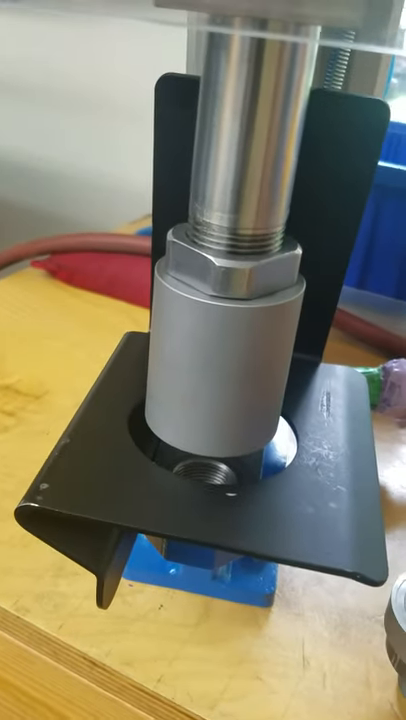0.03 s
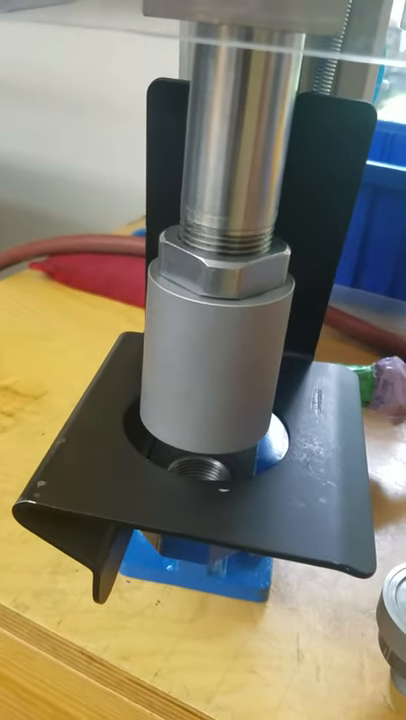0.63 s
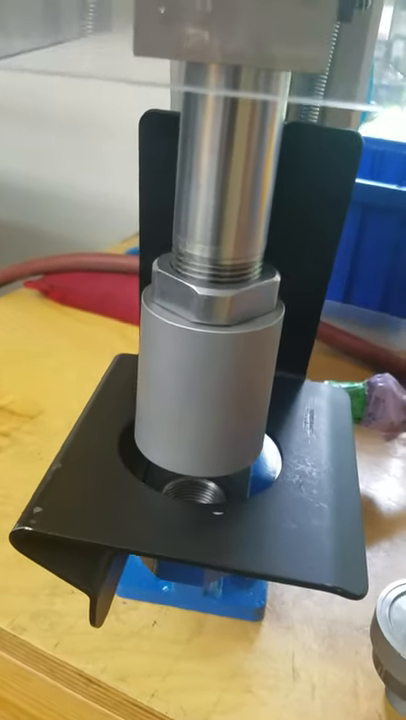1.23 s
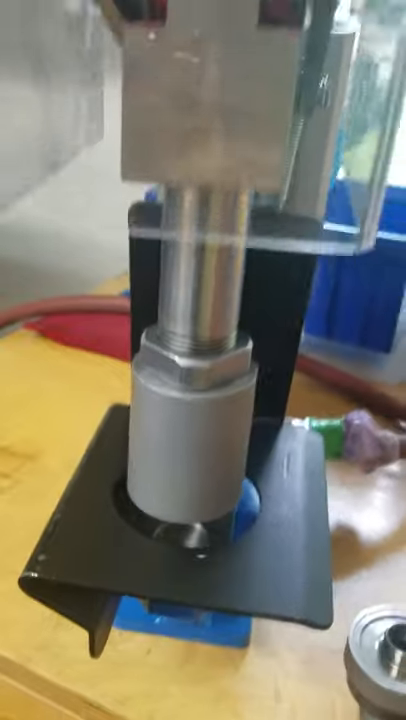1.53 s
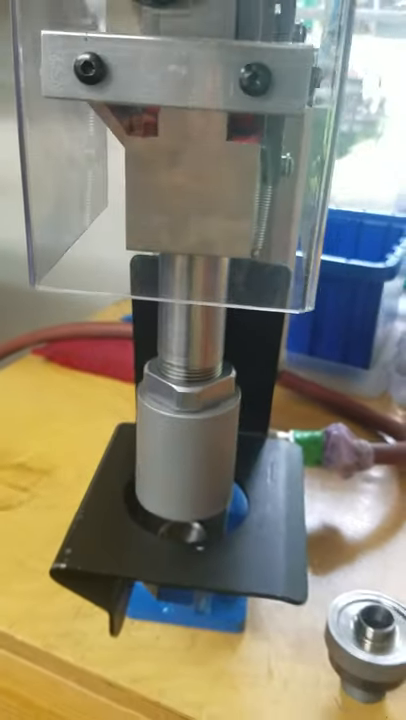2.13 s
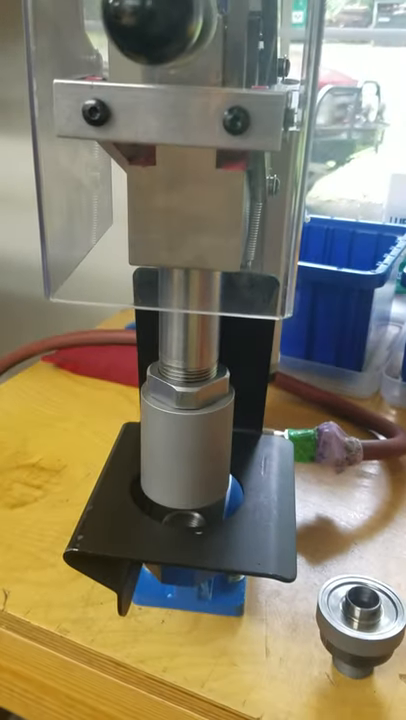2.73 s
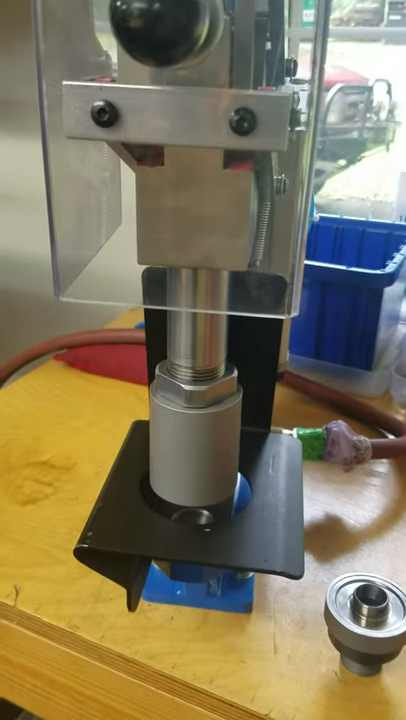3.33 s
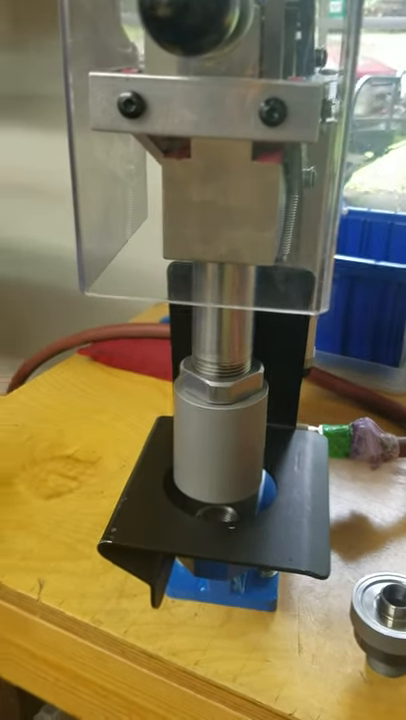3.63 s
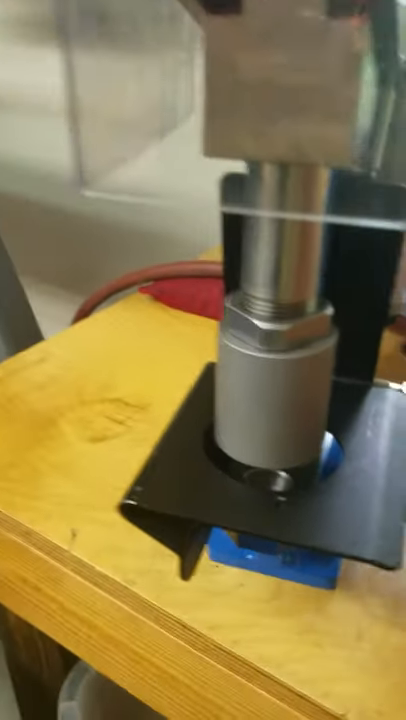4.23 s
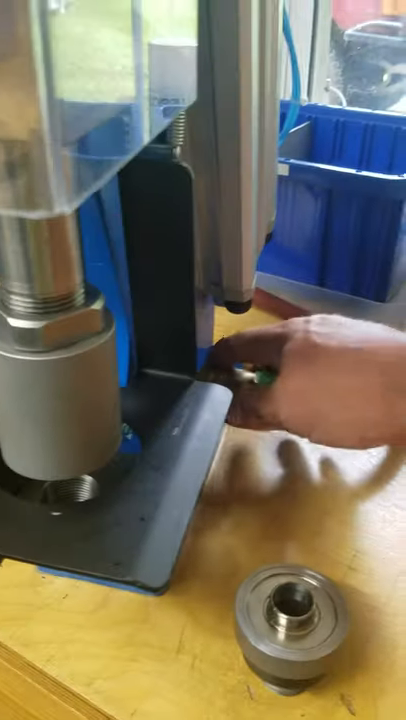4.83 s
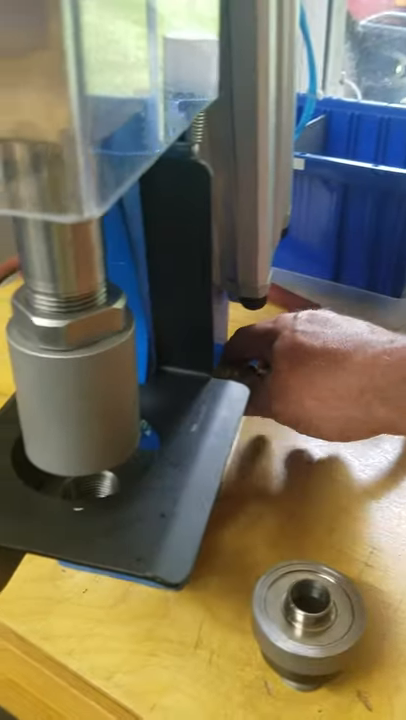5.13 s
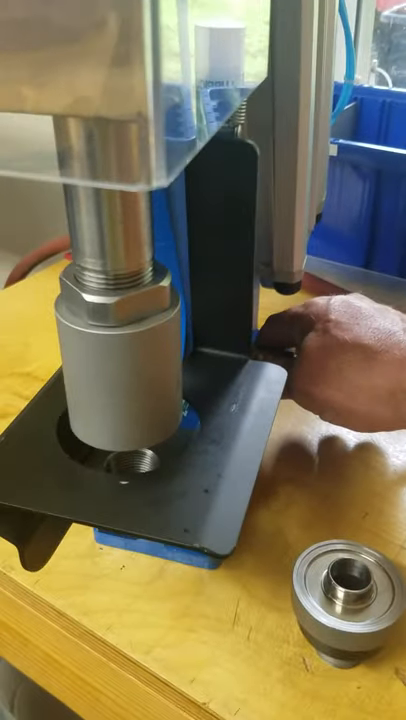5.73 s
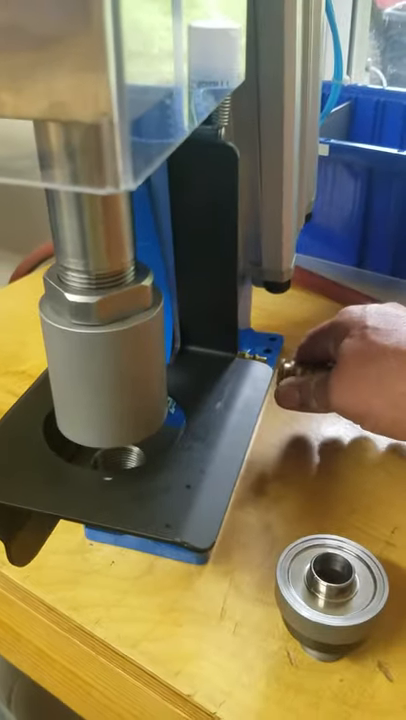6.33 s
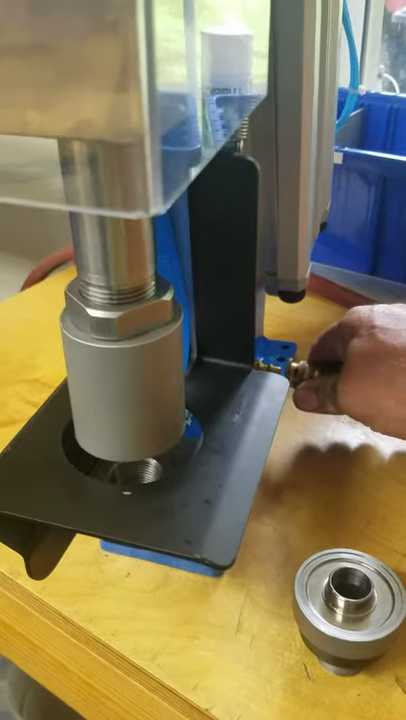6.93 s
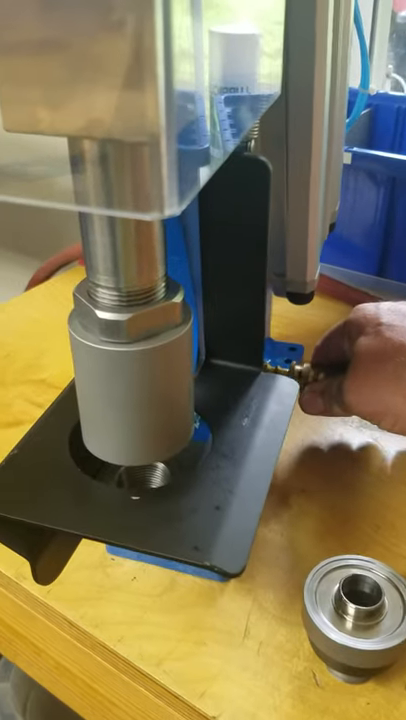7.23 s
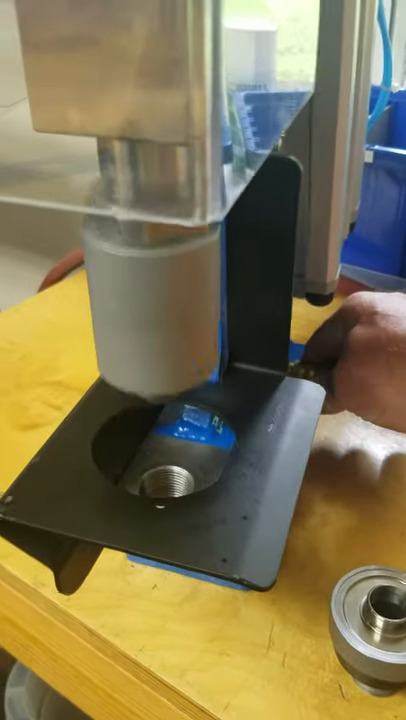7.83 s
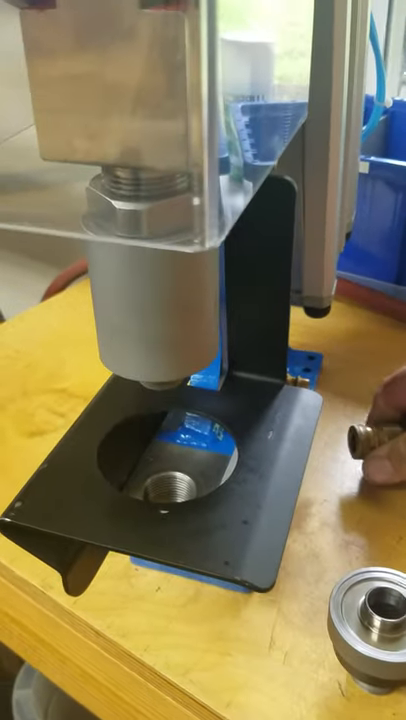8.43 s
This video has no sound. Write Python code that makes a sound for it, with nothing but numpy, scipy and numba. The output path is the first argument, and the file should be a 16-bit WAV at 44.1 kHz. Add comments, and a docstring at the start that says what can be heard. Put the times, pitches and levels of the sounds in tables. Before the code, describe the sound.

Heard close to a pneumatic bench press, a workshop hums steadily with fan noise and a thin leak. A sudden loud hiss of compressed air breaks in for about a second, gusting on the microphone, and ends in a metallic valve snap. A tiny squeak and a few light clicks follow, then a second shrill rush in quick surges, with a metal knock from the ram and a hollow ringing as the air drains.

```python
"""Pneumatic bench press in a humming workshop.

Fans, machine tones and a faint leak run throughout. A hand works the air fitting: it clicks, air
blasts out, gusts over the microphone and rings the cylinder ports. The valve snaps shut, a seal
squeaks, the fitting clicks, then air rushes again and the ram knocks as it lifts. Heard from a
phone close to the ram, whose gain control ducks the hum after each rush."""
import sys
import numpy as np
from scipy import signal
from scipy.fft import rfft, irfft, next_fast_len
from scipy.io import wavfile
from scipy.ndimage import uniform_filter1d, minimum_filter1d, map_coordinates
from numba import njit

SR = 44100
rng = np.random.default_rng(int(sys.argv[2]) if len(sys.argv) > 2 else 0)


def persist_wave(psi):
    """Save psi, clipped to +-1, as 16-bit WAV."""
    counts = np.round(np.clip(psi, -1, 1) * 32767).astype(np.int16)
    wavfile.write(sys.argv[1], SR, np.atleast_2d(counts).T)


N = 374585
TIME_S = np.arange(N) / SR
FREQ_HZ = np.maximum(np.fft.rfftfreq(N, 1 / SR), 1)


def undb(db):
    """Decibels to gain."""
    return np.exp(np.asarray(db) * (np.log(10) / 20))


def unit(x):
    """Scale to rms 1."""
    return x / np.sqrt(np.mean(x ** 2))


def curves(table):
    """Table columns, interpolated linearly over t/s."""
    times_s, *columns = np.transpose(table)
    return [np.interp(TIME_S, np.sort(times_s), column) for column in columns]


def colour(points):
    """Gain spectrum from (f/Hz, level/dB) points."""
    hz, db = np.transpose(points)
    return undb(np.interp(np.log(FREQ_HZ), np.log(hz), db))


def resonances(modes):
    """Gain spectrum of (f/Hz, width/Hz, level/dB) resonances."""
    return np.sqrt(sum(undb(db) ** 2 / (1 + (hz / width_hz * (FREQ_HZ / hz - hz / FREQ_HZ)) ** 2)
                       for hz, width_hz, db in modes))


def above(hz):
    """Gain spectrum of a steep bass cut."""
    return 1 / (1 + (hz / FREQ_HZ) ** 4)


def filtered(x, gain):
    """Apply a gain spectrum."""
    size = next_fast_len(N, True)
    hz = np.fft.rfftfreq(size, 1 / SR)
    return irfft(rfft(x, size) * np.interp(hz, FREQ_HZ, gain), size)[..., :N]


def walk(rate_hz):
    """Smooth random curve, spread near 1."""
    knots = rng.standard_normal(int(N / SR * rate_hz) + 2)
    return 1.2 * np.interp(TIME_S * rate_hz, np.arange(len(knots)), knots)


def air(gain, shared, lag_samples=0):
    """Coloured stereo noise; the shared part lags on the right."""
    noise = rng.standard_normal((3, N))
    common = np.array([noise[2], np.roll(noise[2], lag_samples)])
    return unit(filtered(np.sqrt(shared) * common + np.sqrt(1 - shared) * noise[:2], gain))


def diffuse(gain, mic_gap_m=0.1, sound_m_s=343):
    """Noise from all around: long waves reach both microphones alike, short ones unrelated."""
    coherence = np.sinc(2 * FREQ_HZ * mic_gap_m / sound_m_s)
    mid = filtered(rng.standard_normal(N), gain * np.sqrt(1 + coherence))
    side = filtered(rng.standard_normal(N), gain * np.sqrt(1 - coherence))
    return unit(np.array([mid + side, mid - side]))


def bursts(table, sag_power=2.84):
    """Swell, sag, release. Gives the strongest burst's level/dB, age/s, release loss/dB, extra columns."""
    rows = np.array(table)
    start_s, attack_s, hold_s, db, full_sag_db, release_db_s = rows.T[:6, :, None]
    age_s = np.maximum(TIME_S - start_s, 1e-6)
    rise_db = 40 * np.log10(np.minimum(age_s / attack_s, 1))
    sag_db = full_sag_db * np.clip((age_s - attack_s) / hold_s, 0, 1) ** sag_power
    lost_db = release_db_s * np.maximum(age_s - attack_s - hold_s, 0)
    level_db = db + rise_db - sag_db - lost_db
    strongest = level_db.argmax(axis=0)
    tracks = [track[strongest, np.arange(N)] for track in (level_db, age_s, lost_db)]
    return tracks + list(rows[strongest, 6:].T)


def reflect(x, t60_low_s, t60_high_s, delay_s):
    """Diffuse reflections of unit energy, with separate decays below and above 3 kHz."""
    t = TIME_S[:SR]
    tail = np.zeros((2, SR))
    for band, t60_s in (("low", t60_low_s), ("high", t60_high_s)):
        crossover = signal.butter(2, 3000, band, fs=SR, output="sos")
        tail += signal.sosfilt(crossover, rng.standard_normal((2, SR))) * undb(-60 * t / t60_s)
    tail *= t > delay_s
    return signal.fftconvolve(x, unit(tail) / np.sqrt(SR), axes=1)[:, :N]


def knocks(blows, modes, crack_t60_s, scatter_db, scatter_t60_s):
    """Each blow cracks and rings the modes; bench and guard scatter it."""
    t = TIME_S[:SR // 4]
    ring = sum((-1) ** k * undb(db - 60 * t / t60_s) * np.sin(2 * np.pi * hz * t)
               for k, (hz, t60_s, db) in enumerate(modes))
    ring /= np.abs(ring).max()
    out = np.zeros((2, N))
    for start_s, db, crack_db in blows:
        start = int(start_s * SR)
        crack = rng.standard_normal((2, len(t))) * undb(crack_db - 60 * t / crack_t60_s)
        out[:, start:start + len(t)] += undb(db) * (ring + crack)
    return out + undb(scatter_db) * reflect(out, scatter_t60_s, scatter_t60_s, delay_s=0.00015)


# bench, guard, wall: left delay/s, right delay/s, level/dB
NEAR_ECHOES = [(.0011, 0.001211, -44.5), (.0029, 0.003973, -21.5), (.0047, 0.0077, -13.5),
               (.0083, .0074, -13), (0.0125, .0141, -13)]


def echoes(x):
    """Close, hard surfaces comb the sound differently at each microphone."""
    out = x.copy()
    for left_s, right_s, db in NEAR_ECHOES:
        out += undb(db) * np.array([np.roll(x[0], int(left_s * SR)), np.roll(x[1], int(right_s * SR))])
    return out / np.sqrt(1 + sum(undb(db) ** 2 for _, _, db in NEAR_ECHOES))


# fan spectrum: f/Hz, level/dB
FAN_SPECTRUM = [(20, -12), (45, 2), (80, 4.5), (130, 0), (200, -4.5), (370, -6), (460, -10.5), (620, -9.5),
                (900, -15.5), (1650, -19.5), (2700, -14.5), (4500, -24), (6500, -24), (12000, -46)]


def fans(level_db):
    """Fans and ventilation: diffuse, slightly wavering noise."""
    return echoes(undb(level_db + .5 * walk(4.7)) * diffuse(colour(FAN_SPECTRUM)))


# leak hiss: f/Hz, level/dB
LEAK_SPECTRUM = [(3000, -16.5), (6500, -3.5), (9300, -10), (11000, -8.5), (13000, 2), (15800, -3.5)]
# hiss envelope: t/s, level/dB
LEAK_ENVELOPE = [(0.0, -59.5), (1.36, -57), (1.81, -58), (2.12, -58), (2.5, -57.5), (2.99, -55.5),
                 (3.55, -59), (3.79, -58), (4.23, -52.5), (4.51, -54), (4.71, -59), (5.6, -56.5)]
# whistles: f/Hz, width/Hz, level/dB
LEAK_WHISTLES = [(12824, 7, -5.5), (13502, 5, 4)]


def leak(hiss_db, whistle_db, left_db):
    """The air line leaks and whistles; its hiss grows as the phone turns to it."""
    envelope = undb(hiss_db + curves(LEAK_ENVELOPE)[0])
    hiss = envelope * air(colour(LEAK_SPECTRUM), shared=0.1, lag_samples=11)
    whistle = undb(whistle_db) * air(resonances(LEAK_WHISTLES), shared=.3)
    pan = undb([[left_db / 2], [-left_db / 2]])
    return pan * (echoes(hiss) + whistle)


# mains and machine tones: f/Hz, level/dB
HUM_TONES = [(119.8, -51), (156.4, -64.5), (44.092, -68), (71, -65), (97.577, -61.5), (244.69, -72.5),
             (352, -69.5), (509, -71.5), (587, -70), (617.64, -64.5), (700, -75.5), (1054, -65),
             (1082, -70), (1111, -59), (1347, -63.5), (2322.9, -76), (13502, -66.5)]


def hum(gain_db, drift_rad, right_lag_s):
    """Mains hum and machine tones: steady level, drifting phase."""
    arrival_s = np.array([TIME_S, TIME_S - right_lag_s])
    out = np.zeros((2, N))
    for hz, db in HUM_TONES:
        phase = 2 * np.pi * hz * arrival_s + drift_rad * walk(12)
        out += np.sqrt(2) * undb(db + gain_db) * np.sin(phase)
    return out


# motor tone, whine, whistle: f/Hz
PASSING_TONES_HZ = (1232.6, 1825.1, 6400)
# their envelopes: t/s, motor/dB, whine/dB, whistle/dB
PASSING_ENVELOPES = [(0, -77, -73.5, -67.5), (1.25, -76, -78.5, -71), (1.498, -76, -73.5, -76.5),
                     (3.299, -72, -74, -80), (4.101, -73, -79, -73.5), (4.6, -78.5, -68.5, -78.5),
                     (8.4, -83, -68, -81.5)]


def passing_tones(waver_db, drift_rad):
    """A motor tone, its whine and a thin whistle come and go as the phone moves."""
    out = np.zeros((2, N))
    for hz, db in zip(PASSING_TONES_HZ, curves(PASSING_ENVELOPES)):
        for mic in range(2):
            amplitude = np.sqrt(2) * undb(db + waver_db * walk(5.7))
            out[mic] += amplitude * np.sin(2 * np.pi * hz * TIME_S + drift_rad * walk(4.3))
    return out


# clicks: t/s, level/dB, relative crack/dB
FITTING_BLOWS = [(5.7565, -32.5, -25), (7.202, -34.5, -29.5), (7.356, -56, -20), (7.388, -28.5, -8),
                 (7.4515, -29, -15)]
# fitting ring: f/Hz, t60/s, level/dB
FITTING_MODES = [(431, 0.036, -15), (818, 0.01, 1.5), (1100, .02, -3), (1420, 0.0076, -2),
                 (1904, 0.014, -2), (2631.3, 0.0091, -3), (4497, .02, -16.5), (7300, .02, -20.5)]


def fitting_clicks():
    """The fitting shifts under the fingers and rings."""
    return knocks(FITTING_BLOWS, FITTING_MODES, crack_t60_s=0.012, scatter_db=2.5, scatter_t60_s=0.14)


# venting: t/s, attack/s, hold/s, level/dB, sag/dB, release/(dB/s), surge/dB, shrill/dB, dulling/(dB/s)
JET_BURSTS = [(5.765, 0.015, 0.71, -1.5, 14, 139, 7, 1.5, -0.5),
              (7.553, 0.038, .01, -11, .5, 257, -2, 7.5, 15),
              (7.581, 0.012, .008, -1.5, 1.5, 248, 3.5, 6.5, 13),
              (7.62, 0.045, 0.16, -9, -1, 423.5, -7.5, -1.5, 0),
              (7.845, 0.055, 0.25, -1, 3, 221.5, -6, 9.5, 33)]
# broad hiss: f/Hz, level/dB
HISS_SPECTRUM = [(100, -20.5), (300, -9), (600, -8), (1150, -3.5), (1500, -9), (2300, -3.5), (3300, -3.5),
                 (4600, -1), (6200, 1.5), (8000, 0), (12000, -1), (16000, -4.5)]
# shrill top: f/Hz, level/dB
TOP_SPECTRUM = [(6000, -27.5), (9500, -12), (11200, -4.5), (12600, -1), (15000, 0.5), (16000, -4.5)]
# jet swing: t/s, left minus right/dB
JET_PAN = [(5.8, -3), (6.2, .5), (6.5, 0), (7.6, -1), (7.7, 1), (7.95, -3), (8.15, -1)]


def jet(hiss_db, top_db, flutter_db, sizzle_db):
    """Escaping air: a broad hiss under a shrill, fluttering top that dulls as the pressure drains."""
    surge_s, top_fade_db_per_db = 0.1, 0.42
    sizzle_hz, extra_dulling = 13200, .35
    db, age_s, lost_db, surge_db, shrill_db, dulling_db_s = bursts(JET_BURSTS)
    db = db + surge_db * np.exp(-age_s / surge_s)  # pressure transient on opening
    dulled_db = dulling_db_s * age_s
    shrill_db = shrill_db - dulled_db - top_fade_db_per_db * lost_db
    hiss = undb(hiss_db) * air(colour(HISS_SPECTRUM), shared=0.53, lag_samples=2)
    top = air(colour(TOP_SPECTRUM), shared=0.15, lag_samples=2)
    sizzle = filtered(top, 1. * (FREQ_HZ > sizzle_hz))
    top = top - sizzle + sizzle * undb(sizzle_db * walk(25) - extra_dulling * dulled_db)
    top *= undb(top_db + shrill_db + flutter_db * walk(90))
    pan_db = curves(JET_PAN)[0]
    return (hiss + top) * undb(db + np.array([pan_db, -pan_db]) / 2)


# air on the microphone: t/s, attack/s, hold/s, level/dB, sag/dB, release/(dB/s)
GUST_BURSTS = [(5.765, .016, 0.3716, -0.87, 2, 1101), (6.16, 0.014, 0.026, -15.5, 1.5, 700),
               (7.581, 0.012, .006, -10.5, .5, 598.5), (7.892, .009, 0.031756, -5, 2.5, 650),
               (7.945, 0.021, .07, -5, 8.5, 1000)]
# wind noise: f/Hz, level/dB
GUST_SPECTRUM = [(25, -16.5), (70, -6.5), (160, -0.5), (400, 0), (800, -1), (1400, -2), (2200, -4),
                 (4000, -8), (7000, -24.5), (16000, -29)]


def gust(gust_db, rumble_db, eddy_db, billow_db):
    """Eddies slap each microphone separately; a weak stream leaves mostly rumble."""
    push_db, push_s = 4, 0.044
    rumble_hz, rumble_db_per_db = 105, 0.44
    db, age_s, _ = bursts(GUST_BURSTS)
    db = db + push_db * np.exp(-age_s / push_s)
    eddies = np.array([undb(eddy_db * walk(900) + billow_db * walk(70)) for mic in range(2)])
    slaps = unit(filtered(eddies * rng.standard_normal((2, N)), colour(GUST_SPECTRUM)))
    rumble = filtered(slaps, 1 - above(rumble_hz))
    return (slaps - rumble) * undb(gust_db + db) + rumble * undb(rumble_db + rumble_db_per_db * db)


# port flow: t/s, attack/s, hold/s, level/dB, sag/dB, release/(dB/s), pitch ratio
FLOW_BURSTS = [(6.12, 0.096, 0.39, -27.5, 5, 170.5, 0.74), (7.59, .11, .125, -14.5, 1.0014, 350, 1.1),
               (7.86, .06, .13, -22, -3, 160, 1), (8.07, .075, .012, -10, 0, 144.5, .98)]
# cylinder emptying: t/s, attack/s, hold/s, level/dB, sag/dB, release/(dB/s)
PUFF_BURSTS = [(7.57, 0.031, 0.041, -18.5, -3, 341.5), (7.82, 0.07414, 0.038, -22, -4, 300)]
# ports at pitch ratio 1: f/Hz, width/Hz, level/dB
PORT_MODES = [(900, 370, -9.5), (1370, 243.3, 0), (1868.4, 96.3, -2), (2150, 360, -3), (2820, 150, 0),
              (4900, 1300, -9.5), (7165, 300, -8)]
# chamber: f/Hz, width/Hz, level/dB
CHAMBER_MODES = [(190, 35, -5), (362, 130, -2), (615.3, 243, -8.5), (1020, 31, -14)]


def cylinder_flow(flow_db, puff_db, hollow_db, flutter_db):
    """Air rings the cylinder's ports and, more dully, its chamber; puffs reach the deepest mode."""
    sink_octaves_per_db, linger_db_per_db = 0.1, 0.72
    db, age_s, lost_db, pitch = bursts(FLOW_BURSTS)
    # the moving piston slides the resonances; they sink as the flow dies
    sink = np.maximum(2 ** (-sink_octaves_per_db * lost_db), .5)
    read_index = np.cumsum(pitch * sink) % (N - 1)
    ports = air(resonances(PORT_MODES) * above(650), shared=0.15)
    sliding = np.array([map_coordinates(channel, [read_index], order=3) for channel in ports])
    chamber = air(resonances(CHAMBER_MODES) * above(130), shared=0.43)
    flow = sliding * undb(flow_db + db + flutter_db * walk(50))
    hollow = filtered(chamber, above(380)) * undb(hollow_db + db + linger_db_per_db * lost_db)
    puffs = chamber * undb(puff_db + bursts(PUFF_BURSTS)[0])
    return flow + hollow + puffs


# valve closing: t/s, level/dB, relative crack/dB
VALVE_BLOWS = [(6.7175, -14, -5.5), (6.7225, -24, -5)]
# valve ring: f/Hz, t60/s, level/dB
VALVE_MODES = [(345.7, 0.048, 11), (553, .035, 5), (874, .032, 6), (2869.6, .05, 2), (3140, .035, 3),
               (5000, .06, -14), (6530, .037, -11), (10250, .025, 4), (14301, .02, 5.5)]


def valve_snap():
    """The valve snaps shut and rings."""
    return knocks(VALVE_BLOWS, VALVE_MODES, crack_t60_s=.045, scatter_db=-6, scatter_t60_s=.04)


# relaxing seal: t/s, f/Hz, level/dB
SEAL_GLIDE = [(6.78, 1600, -70), (6.825, 1546, -50), (6.87, 1433, -56.5), (6.91, 1410, -56),
              (6.99, 1400, -68)]


def seal_squeak(jitter):
    """Rubber slips on steel: one faint, unsteady falling tone."""
    hz, db = curves(SEAL_GLIDE)
    sounding = (TIME_S > SEAL_GLIDE[0][0]) & (TIME_S < SEAL_GLIDE[-1][0])
    phase = 2 * np.pi * np.cumsum(hz * (1 + jitter * walk(300))) / SR
    return sounding * undb(db) * np.sin(phase)


# ram rattle: t/s, level/dB, relative crack/dB
RAM_BLOWS = [(7.8328, 2.5, -27), (7.8355, 8, -12.5), (7.841, 3.5, -20), (7.851, -1, -24)]
# frame ring: f/Hz, t60/s, level/dB
FRAME_MODES = [(147.7, 0.0998, -20.5), (227, 0.1119, -16.5), (343, 0.07, -6), (433, 0.059, -4),
               (620.64, .06, -3), (826, 0.0218, -5), (980, 0.024, -6), (1260, 0.016, -1.5),
               (1736, 0.079, -13), (2270, 0.041, -19.5)]


def ram_knock():
    """The ram breaks loose and rattles, ringing the frame."""
    return knocks(RAM_BLOWS, FRAME_MODES, crack_t60_s=0.029, scatter_db=-4.5, scatter_t60_s=0.032)


def scene():
    """Workshop, press, room reflections and wind on the microphone."""
    workshop = fans(level_db=-49.5) + leak(hiss_db=2.5, whistle_db=-63.5, left_db=4.5)
    workshop += hum(gain_db=1.5, drift_rad=0.16, right_lag_s=0.00033)
    workshop += passing_tones(waver_db=1.1, drift_rad=0.59)
    press = fitting_clicks()
    press += echoes(jet(hiss_db=-5.5, top_db=-2.5, flutter_db=1.0, sizzle_db=0.3))
    wind = gust(gust_db=-0.5, rumble_db=0.5, eddy_db=1.5, billow_db=0.5)
    press += echoes(cylinder_flow(flow_db=0.5, puff_db=1.5, hollow_db=-16, flutter_db=1.6553))
    press += valve_snap() + seal_squeak(jitter=0.01813) + ram_knock()
    room = undb(-11) * reflect(press, t60_low_s=0.55, t60_high_s=0.49, delay_s=0.0093)
    return workshop + press + room + wind


@njit
def follow(target_db, attack_s, recover_db_s):
    """Gain/dB: exponential fall, linear recovery."""
    out, gain_db = np.zeros(len(target_db)), 0.
    for i in range(len(target_db)):
        if target_db[i] < gain_db:
            gain_db += (target_db[i] - gain_db) / (attack_s * SR)
        else:
            gain_db = min(target_db[i], gain_db + recover_db_s / SR)
        out[i] = gain_db
    return out


def wind_filter(x, threshold_db, depth_db, lag_s, attack_s, corner_hz):
    """A while after strong rumble, the phone lowers the bass and leaves it low."""
    bass = filtered(x, 1 - above(corner_hz))
    bass_db = 10 * np.log10(uniform_filter1d(np.mean(bass ** 2, axis=0), size=SR // 20) + 1e-12)
    cut_db = np.clip(threshold_db - bass_db, -depth_db, 0)
    late_db = np.interp(TIME_S - lag_s, TIME_S, cut_db)
    return x - bass + bass * undb(follow(late_db, attack_s, 0.))


def gain_control(x, threshold_db, depth_db, hold_s, attack_s, recover_db_s):
    """Loud sound turns the gain down; it holds, then climbs back."""
    power = signal.lfilter([1 / 300], [1, 1 / 300 - 1], np.mean(x ** 2, axis=0))
    cut_db = np.clip(threshold_db - 10 * np.log10(power + 1e-12), -depth_db, 0)
    hold_samples = int(hold_s * SR)
    held_db = minimum_filter1d(cut_db, hold_samples, origin=(hold_samples - 1) // 2)
    return x * undb(follow(held_db, attack_s, recover_db_s))


# microphone mismatch: f/Hz, left minus right/dB
MIC_BALANCE = [(60, -4), (250, -3), (1000, -2), (4000, -.5), (8000, 0), (12000, 3.5), (16000, 4)]


def record(dry):
    """Unequal microphones, wind filter, gain control, full-scale clip, steep top cut."""
    tilt = np.sqrt(colour(MIC_BALANCE))
    x = np.array([filtered(dry[0], tilt), filtered(dry[1], 1 / tilt)])
    x = wind_filter(x, threshold_db=-33.5, depth_db=7.5, lag_s=1.4, attack_s=0.11, corner_hz=192.3)
    x = gain_control(x, threshold_db=-30, depth_db=13, hold_s=.36, attack_s=.007, recover_db_s=17)
    top_cut = signal.ellip(10, .2, 70, 15850, fs=SR, output="sos")
    return signal.sosfilt(top_cut, np.clip(x, -1, 1))


dry = scene()
out = record(dry)
persist_wave(out)
```